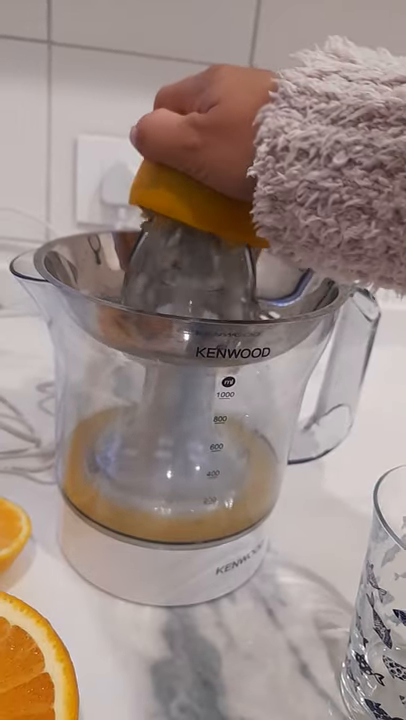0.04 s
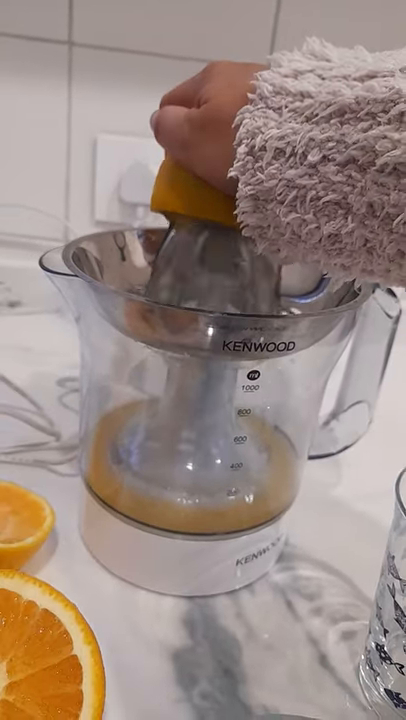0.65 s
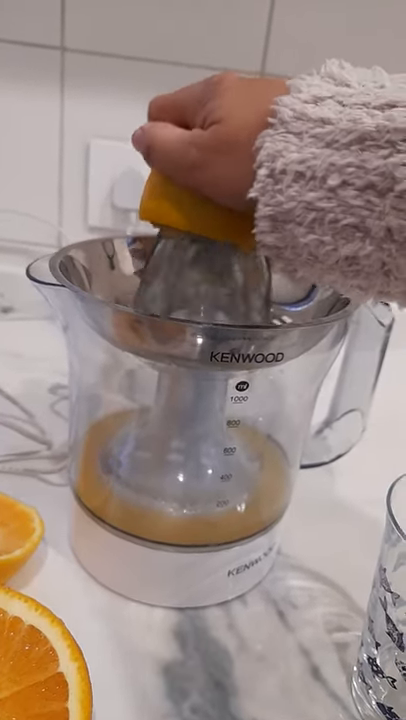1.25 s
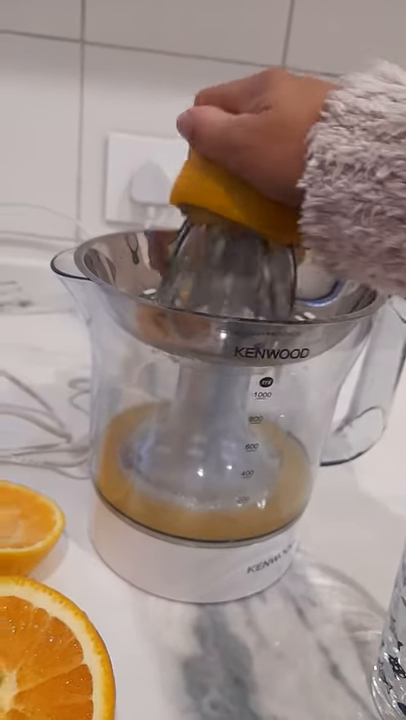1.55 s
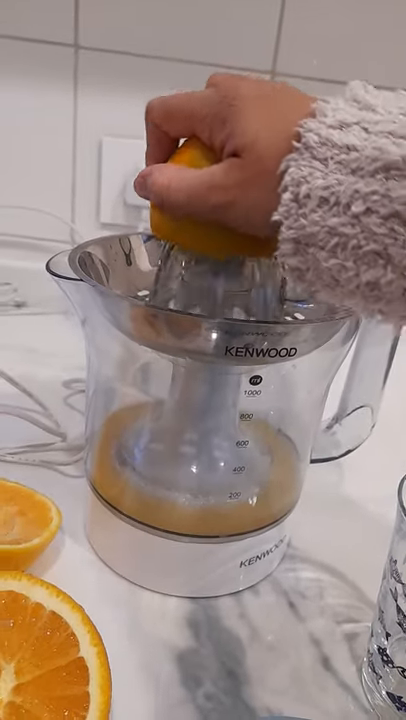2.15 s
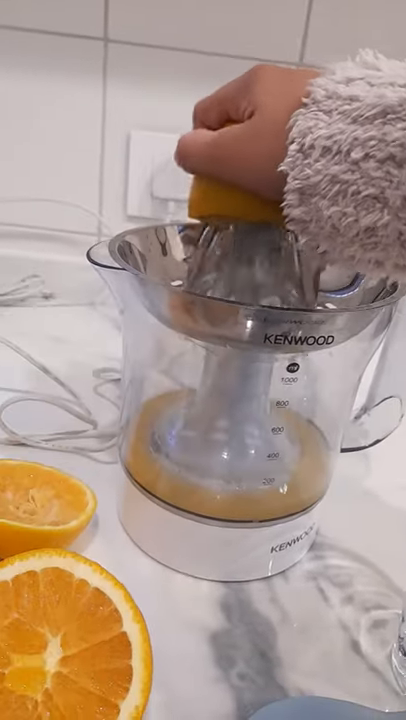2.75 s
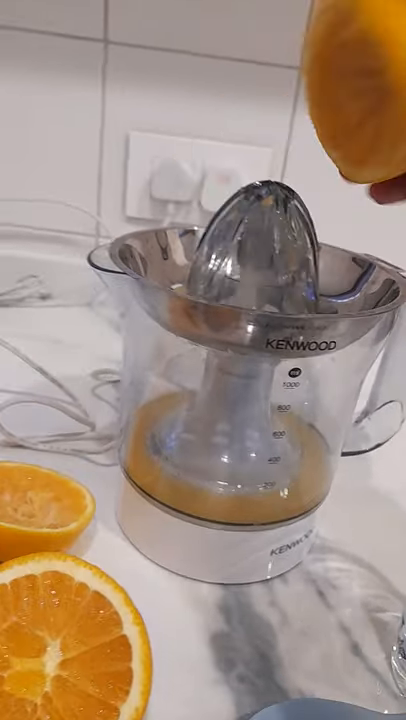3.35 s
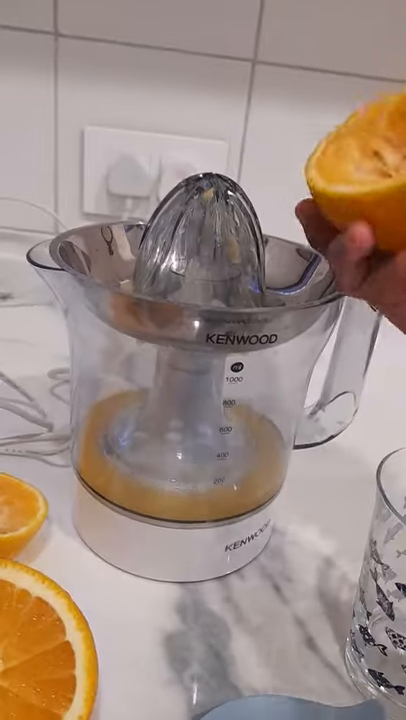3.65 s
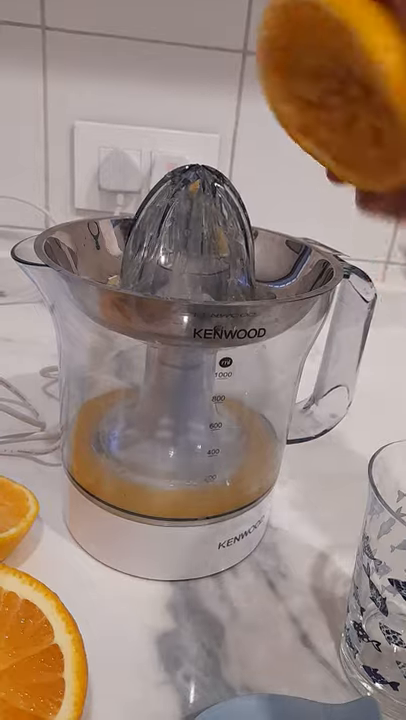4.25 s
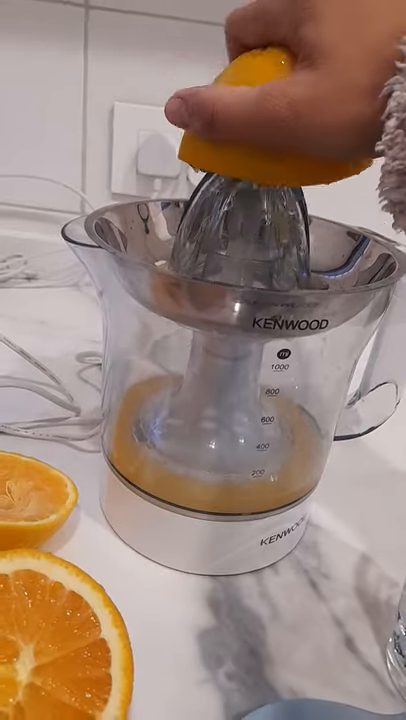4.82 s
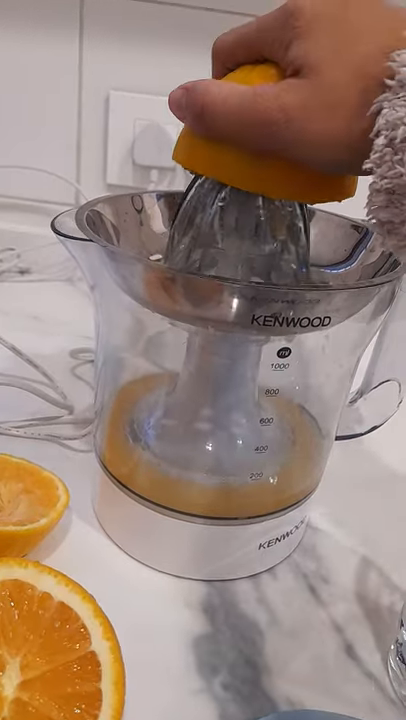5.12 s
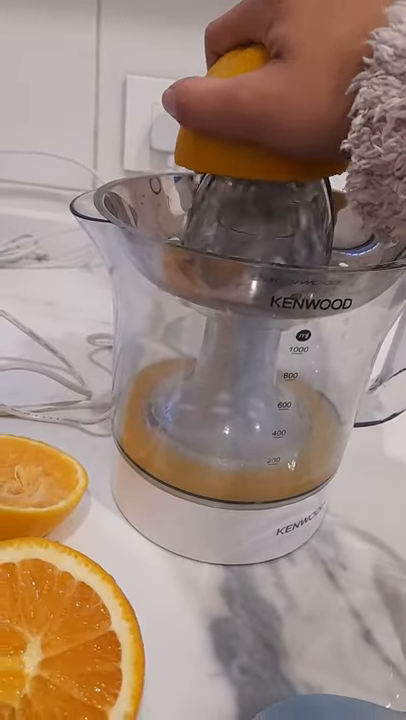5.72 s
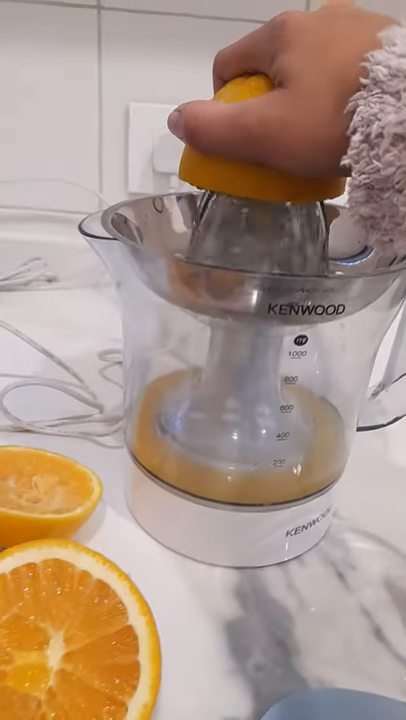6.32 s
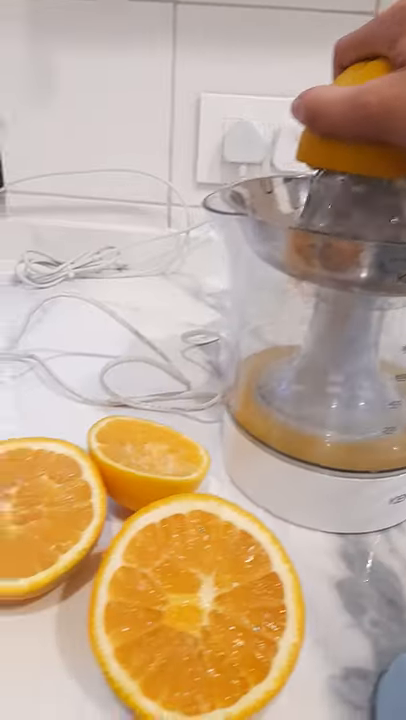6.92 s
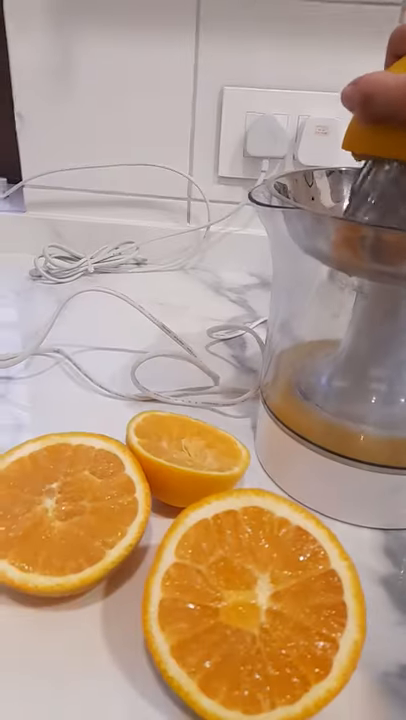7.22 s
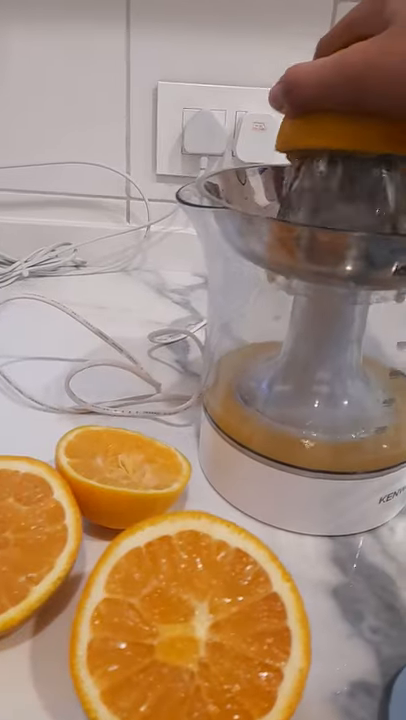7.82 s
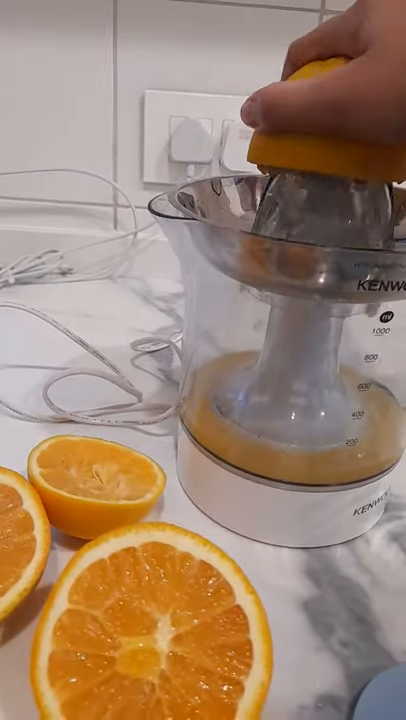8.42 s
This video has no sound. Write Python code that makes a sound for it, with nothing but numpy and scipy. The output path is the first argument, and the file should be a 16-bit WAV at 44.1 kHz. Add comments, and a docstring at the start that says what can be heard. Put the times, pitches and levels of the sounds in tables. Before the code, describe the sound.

The loud, rattling hum of an electric juicer squeezing oranges, broken by a short pause with faint wet squelches before it restarts.

```python
"""Electric citrus juicer

A juicer squeezes two orange halves on a kitchen worktop, stopping for two seconds in between.
Its synchronous motor hums at harmonics of the mains, its plastic gears whine and chatter under the
pulsating torque, and the reamer grinds by friction, louder as the hand bears down.
The pulp squelches faintly in the pause, and the motor restarts with a few clacks."""
import sys
import numpy as np
from scipy import signal
from scipy.fft import rfft, irfft
from scipy.io import wavfile

SR = 44100
rng = np.random.default_rng(int(sys.argv[2]) if len(sys.argv) > 2 else 0)


def log_audio(samples):
    """Write samples as a 16-bit WAV file to the path given in sys.argv[1]."""
    # one column per channel
    frames = np.atleast_2d(samples).T
    # limit to full scale, then quantise
    limited = np.clip(frames, -1, 1)
    pcm = np.round(limited * 32767).astype(np.int16)
    wavfile.write(sys.argv[1], SR, pcm)


N = 377937
T = np.arange(N) / SR
SLOW_T = T[::128]  # coarse time axis for envelopes
HZ = np.fft.rfftfreq(8192, 1 / SR)

MAINS_HZ = 50.06
GEAR_HZ = MAINS_HZ * 2 / 9  # turns of the gear per second
RUN_UP_S = 0.16  # from switching on until the rotor locks to the mains
DRONE_HARMONICS = (2, 6, 10)

# Levels in the tables are relative; pan_db is left minus right.
# Motor runs, one per orange half: on_s, off_s, chatter_db, scrape_db
PRESSES = [(-.4, 2.956, -29.5, -42.5), (5.138, 8.8, -29.5, -40.5)]
SECOND_HALF_S = PRESSES[0][1] + 1  # in the pause; the second-press columns apply from here
# Hum partials on the mains frequency: harmonic, first_press_db, second_press_db, pan_db
HUM_PARTIALS = [(4, -43, -40, 0), (5, -61, -46, -2), (8, -46, -42, -2), (9, -57, -46, 0),
                (12, -36, -41, -1), (13, -50, -49, -3), (14, -47, -34, -7), (16, -47, -50, 9),
                (17, -48, -46, 4), (19, -53, -44, 5), (20, -49, -45, 3), (22, -42, -47, 6),
                (23, -48, -47, 5), (24, -30, -36, 1), (25, -51, -48, -2), (26, -40, -45, -9),
                (28, -45, -38, -3), (29, -48, -44, -3), (30, -46, -45, -3), (36, -49, -52, -5),
                (40, -48, -52, -6)]
# Drifting low hum partials, one list per press: time_s, harmonic_2_db, harmonic_6_db, harmonic_10_db
DRONE_LEVELS = [
    [(0, -37, -31.5, -26), (.6, -39, -33, -29.5), (1.2, -34.5, -32.5, -31), (1.7, -40.5, -35.5, -30),
     (2.2, -46, -32.5, -28.5), (2.95, -36.5, -33, -29.5)],
    [(5.33, -38, -23.5, -37), (5.5, -31, -22.5, -33.5), (6.0, -28.5, -23.5, -41.5),
     (6.6, -31, -25.5, -35.5), (7.2, -29, -25, -50), (7.7, -32.5, -26.5, -31), (8.2, -27.5, -25.5, -49),
     (8.57, -26, -25.5, -30)],
]
# Whine partials on the gear's turning rate: harmonic, first_press_db, second_press_db, pan_db
WHINE_PARTIALS = [(13, -45, -49, 0), (23, -46, -47, -2), (25, -44, -52, -7), (58, -43, -48, -3),
                  (59, -40, -49, -6), (67, -46, -52, 0), (72, -47, -54, 4), (76, -40, -36, 5),
                  (77, -45, -39, 3), (85, -48, -43, 3), (86, -48, -42, 5), (94, -41, -55, -2),
                  (95, -41, -50, -2), (98, -46, -50, 8), (100, -45, -47, 1), (103, -40, -39, 6),
                  (104, -44, -41, 3), (107, -55, -41, -1), (109, -41, -38, 2), (112, -41, -42, -1),
                  (113, -44, -46, -2), (121, -48, -48, -3), (127, -51, -46, -4), (130, -39, -39, 4),
                  (131, -42, -43, -3), (139, -45, -52, -2), (140, -46, -48, -2)]
# Broad response of the housing: frequency_hz, gain_db
HOUSING_RESPONSE = [(25, -24.5), (55, -14.5), (80, -9), (200, -8), (400, -5), (800, -1.5), (1300, -1),
                    (1900, -2), (2500, -14), (4000, -17.5), (8000, -28.5), (16000, -49)]
# Resonances of the housing: frequency_hz, width_hz, lift_db
HOUSING_MODES = [(88.2, 24, 16.2), (143, 20, 3.9), (304.2, 52, 15.5), (484.8, 66.4, 14.6),
                 (699.5, 110, 4.8), (1162, 150, 9.8), (1432, 143, 10.7)]
# Response of the reamer and jug: frequency_hz, first_press_db, second_press_db
REAMER_RESPONSE = [(60, -22, -17), (302.5, -1.5, -6.5), (480, 7.5, 6.5), (793, -9, -10), (1490, -9, 0.5),
                   (2180, 3, -0.5), (3130, 3.5, 0.5), (3390, -6, -3), (4120, 2, 0), (5170, -7, -6.5),
                   (7070, -9.5, -11), (7980, -18, -20), (12300, -16, -16), (16000, -27, -29)]
# Ribs biting into the fruit as the hand bears down: start_s, rise_s, hold_s, level_db
BITES = [(0.128, 0.039, 0.022, -31.5), (0.292, .03, .02, -35), (0.48, .055, 0.056, -27.5),
         (0.643, .02, 0.044, -35), (0.81, 0.017, 0.048, -38), (0.947, 0.01, 0.019, -35.5),
         (1.05, .012, 0.13, -32), (1.153, 0.024, 0.12, -31), (1.437, 0.0087, 0.024, -32),
         (1.567, 0.024, .01, -39), (1.682, 0.02, 0.031, -31), (1.896, .012, 0.02, -30),
         (2.047, 0.024, .015, -31.5), (2.122, 0.022, 0.027, -33), (2.255, .012, 0.15, -37.5),
         (2.405, 0.039, 0.075, -33), (2.689, .018, 0.0072, -29.5), (2.745, 0.074, .04, -34),
         (2.855, 0.055, 0.11, -28), (5.168, 0.012, .04, -39), (5.214, .01, 0.1, -31.5),
         (5.38, 0.072, 0.26, -33.5), (6.117, 0.056, 0.33, -32), (6.506, 0.026, 0.13, -35.5),
         (6.75, 0.036, 0.034, -35), (6.895, 0.024, 0.03, -37), (7.326, 0.083, .13, -37),
         (7.512, 0.034, 0.14, -33), (7.72, .03, .25, -37)]
# Spectrum of a bearing tap: frequency_hz, level_db
BEARING_SPECTRUM = [(300, -14), (3000, 0), (8000, -6.5), (11000, -8), (14000, -6), (16000, -12)]
# Plastic impacts as the reamer catches, lifts and engages: start_s, crack_db, thump_db
CLACKS = [(.298, -31, -34), (.551, -35, -31), (.689, -27, -30), (.957, -32, -29), (1.049, -27, -23.5),
          (1.218, -40, -38), (1.447, -43, -46), (1.489, -27, -22), (1.908, -46, -24), (2.07, -27.5, -23),
          (2.256, -29, -41), (2.696, -33.5, -36), (2.927, -42, -41), (2.976, -38, -23), (3.177, -54, -32.5),
          (3.21, -49, -37.5), (5.142, -39.5, -35), (5.166, -31.5, -21), (5.2, -35, -16),
          (5.222, -23.5, -23), (5.268, -39, -22)]
# Response of the base to a clack: frequency_hz, gain_db
THUMP_RESPONSE = [(40, -29.5), (90, 3.5), (180, -14), (290, 2), (380, -11.5), (480, 6.5), (650, -14),
                  (1400, -13.5), (3000, -22.5), (12000, -52)]
# Base rocking as the rotor coasts down or runs up: peak_s, level_db, rise_db_per_s, fall_db_per_s
ROCKS = [(3.0, -31.5, 452, 68), (5.25, -29.5, 139, 220)]
# Response of the base on its feet: frequency_hz, gain_db
ROCKING_RESPONSE = [(30, -44.5), (62, -25), (86, 4.5), (115, -21), (143, -7), (190, -22), (290, -6.5),
                    (400, -26.5), (1500, -50)]
# Wet ticks of the pulp: start_s, level_db
SQUELCHES = [(3.778, -75.5), (3.996, -61.5), (4.052, -69), (4.08, -66), (4.111, -71), (4.482, -71),
             (4.53, -72), (4.629, -60), (4.772, -66), (4.955, -62), (4.971, -65), (5.016, -58), (5.06, -54),
             (5.117, -59)]
# Spectrum of a wet tick: frequency_hz, level_db
PULP_SPECTRUM = [(200, -26), (1500, -14.5), (3000, -13), (6000, -1.5), (7500, 3), (12000, -3),
                 (16000, -10.5)]
# The next half is turned in the hand and set on the reamer: start_s, rise_s, hold_s, rustle_db, rub_db
HANDLING = [(4.33, 0.084, 0.25, -76.5, -62.5), (4.76, .07, 0.14, -79, -60.5), (4.94, 0.069, 0.18, -67, -60)]
# Spectrum of the handled fruit's rustle: frequency_hz, level_db
RUSTLE_SPECTRUM = [(300, -14), (2500, 2), (6000, 8.5), (9000, -8.5), (16000, -9.5)]
# Ambient noise of the kitchen: frequency_hz, level_db
KITCHEN_SPECTRUM = [(15, -70.5), (25, -34), (44, -12.5), (101, -6), (122, -22.5), (193, -4), (260, -14),
                    (297, -0.5), (322, -8.5), (410, -10.5), (919, -25.5), (3440, -43.5), (12200, -37),
                    (15500, -45.5)]
# Reverberation time of the kitchen: frequency_hz, t60_s
REVERB_TIMES = [(100, 1), (260, 0.59), (700, 0.68), (1840, 0.66), (4850, 0.48), (14000, 0.3)]
# Paths to the two microphones: frequency_hz, pan_db, left_lead_rad, scattered_to_direct_ratio
STEREO_PATHS = [(98.7, 1, 0.25, .03), (292, -4.5, 0.4, .1), (496, -3, 0.63, 0.3), (750, 3.5, 0.96, 0.87),
                (1196, -2, -1.14, 1), (3080, 0, -2, 1.6), (5550, -1.5, -2, 2.7), (7960, 0, -6, 0.95),
                (12060, 4, -4.5, 1.3)]


def motor_hum(gain_db):
    """Synchronous rotation: a rotor locked to the mains vibrates at harmonics of the mains frequency."""
    return sum(partial(harmonic * MAINS_HZ, gain_db + per_press(levels_db), pan_db)
               for harmonic, *levels_db, pan_db in HUM_PARTIALS)


def motor_drone():
    """Amplitude modulation: three strong low harmonics of the motor slowly swell and fade."""
    times, *curves_db = np.vstack(DRONE_LEVELS).T
    pitches_hz = MAINS_HZ * np.array(DRONE_HARMONICS)
    return sum(partial(hz, np.interp(SLOW_T, times, curve_db), curve(STEREO_PATHS, hz))
               for hz, curve_db in zip(pitches_hz, curves_db))


def gear_whine(gain_db):
    """Periodic excitation: meshing repeats each turn, giving harmonics of the gear's turning rate."""
    return sum(partial(harmonic * GEAR_HZ, gain_db + per_press(levels_db), pan_db)
               for harmonic, *levels_db, pan_db in WHINE_PARTIALS)


def partial(hz, level_db, pan_db):
    """Narrow-band modulation: one stereo tone of the drive sways in level and flutters in phase."""
    sway_db = 1.13 * min(hz / 800, 1)
    flutter = 1 + per_press((0.15, 0.05)) * (wander(SLOW_T, 22) + 1j * wander(SLOW_T, 22))
    envelope = rotor_lock() * gain_of(level_db + sway_db * wander(SLOW_T, 4)) * flutter
    tone = np.interp(T, SLOW_T, envelope) * np.exp(2j * np.pi * (hz * T + rng.random()))
    path = gain_of(pan_db / 2) * np.exp(0.5j * curve(STEREO_PATHS, hz, column=2))
    constant_power = np.sqrt(2 / np.cosh(2 * np.log(abs(path))))
    return constant_power * np.array([(tone * path).real, (tone / path).real])


def rotor_lock(lock_s=0.062, drop_s=0.031, linger_s=0.1):
    """Two-stage decay: the tones enter as the rotor locks, drop at switch-off, then linger in the room."""
    envelope = np.zeros(len(SLOW_T))
    for on, off, *_ in PRESSES:
        onset = np.clip((SLOW_T - on - RUN_UP_S) / lock_s + 0.5, 0, 1)
        since_off = np.maximum(SLOW_T - off, 0)
        envelope += onset * np.maximum(np.exp(-since_off / drop_s), 0.22 * np.exp(-since_off / linger_s))
    return envelope


def running(on, off, spin_up_s=0.021, cut_s=0.045):
    """Inertia: the drive ramps briefly up to 1 at switch-on and down to 0 at switch-off."""
    return np.clip((T - on) / spin_up_s, 0, 1) * np.clip(1 - (T - off) / cut_s, 0, 1)


def torque_ripple(depth_db, snap):
    """Torque ripple: the motor pulls twice per mains cycle, and snapping gear play adds overtones."""
    angle = 4 * np.pi * MAINS_HZ * T
    return gain_of(depth_db * (np.cos(angle) + snap * (np.cos(2 * angle) + np.cos(3 * angle))))


def gear_chatter(backlash_s, uneven_db, loose_ratio, carry, per_turn):
    """Impact excitation: tooth strikes, jittered by backlash, and loose extra strikes ring the housing."""
    places = (np.arange(per_turn) + rng.random(per_turn)) / per_turn
    signs = rng.choice([-1, 1], per_turn)
    turns = np.arange(int(N / SR * GEAR_HZ) + 1)[:, None]
    times = (turns + places) / GEAR_HZ + backlash_s * rng.standard_normal((len(turns), per_turn))
    sizes = signs * gain_of(uneven_db * rng.standard_normal(times.shape))
    teeth = unit_rms(impulses(times.ravel(), sizes.ravel()))
    # tooth strikes are kept above 650 Hz, leaving the low hum clear
    teeth = signal.sosfilt(signal.butter(4, 650, "high", fs=SR, output="sos"), teeth)
    loose = rng.choice([-1, 1], N) * rng.uniform(0.44, 1, N) * (rng.random(N) < 1600 / SR)
    # a loose strike comes back, weaker, on the next turns of the rotor
    loose = sum(carry ** turn * np.roll(loose, round(turn * SR / MAINS_HZ)) for turn in range(4))
    strikes = (teeth + loose_ratio * unit_rms(loose)) * torque_ripple(depth_db=3.5, snap=0.25)
    modes_db = sum(db / (1 + (2 * (HZ - hz) / width) ** 4) for hz, width, db in HOUSING_MODES)
    sound = radiate(strikes, curve(HOUSING_RESPONSE, HZ) + modes_db, scatter_s=0.0044)
    return sound / band_rms(sound, 1000, 1600)


def chatter_strength(load, surge_db=9, surge_at_s=0.161, surge_width_s=0.018, taut_db=-1.5):
    """Backlash: chatter surges as the rotor pulls into lock and eases when load takes up the play."""
    drive = np.zeros(N)
    for on, off, chatter_db, _ in PRESSES:
        surge = np.exp(-((T - on - surge_at_s) / surge_width_s) ** 2)
        drive += running(on, off) * gain_of(chatter_db + surge_db * surge)
    tautness = np.minimum(load / gain_of(-26.5), 1)
    return drive * gain_of(taut_db * tautness)


def reamer_grinding(slips_per_s, spread_db, clump_db, ribs):
    """Stick-slip friction: each rib scrapes in clumps of tiny impacts, ringing the jug by its own path."""
    grip = torque_ripple(depth_db=2.0, snap=0.86) * gain_of(clump_db * wander(T, 60))
    in_second = T > SECOND_HALF_S
    out = np.zeros((2, N))
    for column, active in enumerate([~in_second, in_second], 1):
        sound = np.zeros((2, N))
        for _ in range(ribs):
            sizes = gain_of(spread_db * np.minimum(rng.exponential(1, N), 3)) * rng.choice([-1, 1], N)
            slips = (rng.random(N) < slips_per_s / ribs / SR) * sizes * grip
            sound += radiate(slips, curve(REAMER_RESPONSE, HZ, column), scatter_s=0.0044)
        out += active * sound / band_rms(sound, 2720, 12000)
    return out


def reamer_load():
    """Power addition: a steady scrape and the strongest bite combine while the motor runs."""
    bite = np.max([gain_of(db) * swell(*timing) for *timing, db in BITES], axis=0)
    return sum(running(on, off) * np.hypot(gain_of(scrape_db), bite) for on, off, _, scrape_db in PRESSES)


def bearing_buzz(level_db, uneven_db):
    """Periodic impacts: in the second press the rotor taps its bearing at each torque pulse."""
    times = np.arange(int(N / SR * 2 * MAINS_HZ)) / (2 * MAINS_HZ)
    sizes = gain_of(uneven_db * rng.standard_normal(len(times)))
    taps = impulses(times, sizes * (times > PRESSES[1][0] + RUN_UP_S))
    return gain_of(level_db) * unit_rms(radiate(taps, curve(BEARING_SPECTRUM, HZ), scatter_s=0.00079))


def reamer_clacks():
    """Transient response: each clack excites a bright crack in the jug and a low thump in the base."""
    crack = bursts(CLACKS, REAMER_RESPONSE, decay_s=0.0064, scatter_s=0.003)
    thump = bursts(CLACKS, THUMP_RESPONSE, decay_s=0.012, scatter_s=0.0093, column=2)
    return gain_of(10) * crack + gain_of(3) * thump


def base_rocking():
    """Forced vibration: the base shudders at its low resonances as the rotor stops and restarts."""
    envelope = sum(gain_of(db - np.maximum(rise * (peak - T), fall * (T - peak)))
                   for peak, db, rise, fall in ROCKS)
    shudder = radiate(rng.standard_normal(N), curve(ROCKING_RESPONSE, HZ), scatter_s=0.004)
    return envelope * unit_rms(shudder)


def pulp_squelches():
    """Broadband transients: the wet pulp ticks in very short, bright bursts."""
    return gain_of(4.5) * bursts(SQUELCHES, PULP_SPECTRUM, decay_s=0.0031, scatter_s=0.0017)


def handling_and_ambience(ambient_db):
    """Friction noise: fruit turned in the hand rubs and rustles over the kitchen's steady low noise."""
    murmur = radiate(rng.standard_normal(N), curve(KITCHEN_SPECTRUM, HZ), scatter_s=0.0093)
    grains = rng.standard_normal(N) * (rng.random(N) < 1500 / SR) * gain_of(2.4 * wander(T, 27))
    rustle = radiate(grains, curve(RUSTLE_SPECTRUM, HZ), scatter_s=0.0023)
    touches = [gain_of([[rustle_db], [rub_db]]) * swell(*timing) for *timing, rustle_db, rub_db in HANDLING]
    rustle_gain, rub_gain = np.max(touches, axis=0)
    return np.hypot(gain_of(ambient_db), rub_gain) * unit_rms(murmur) + rustle_gain * unit_rms(rustle)


def reverberation(x):
    """Diffuse field: tiled walls return a dense tail in which each band decays at its own rate."""
    reflections = rng.standard_normal((2, SR)) * (np.arange(SR) > 0.005 * SR)
    hz, t, bands = signal.stft(reflections, SR, nperseg=512)
    coherence = 1 / (1 + (hz[:, None] / 700) ** 2)  # long waves reach both microphones alike
    bands[1] = coherence * bands[0] + np.sqrt(1 - coherence ** 2) * bands[1]
    decay = gain_of(-60 * t / curve(REVERB_TIMES, hz)[:, None])
    tail = signal.istft(bands * decay, SR, nperseg=512)[1]
    return signal.fftconvolve(x, tail / np.linalg.norm(tail[0]), axes=1)[:, :N]


def radiate(x, response_db, scatter_s):
    """Source-filter principle: x rings a minimum-phase body, then travels to both microphones."""
    log_gain = np.log(gain_of(np.r_[response_db, response_db[-2:0:-1]]))
    body = np.exp(np.conj(signal.hilbert(log_gain)))[:len(HZ)]
    channels = []
    for side in (1, -1):
        direct = np.exp(0.5j * side * curve(STEREO_PATHS, HZ, column=2))
        path = direct + curve(STEREO_PATHS, HZ, column=3) * scattering(scatter_s)
        # pan, and flatten the interference ripple
        path *= gain_of(side * curve(STEREO_PATHS, HZ) / 2) / abs(path) ** 1.12
        impulse_response = np.roll(irfft(body * path), 64)[:4096]
        channels.append(signal.oaconvolve(x, impulse_response)[64:N + 64])
    return np.array(channels)


def scattering(decay_s):
    """Multiple reflection: the spectrum of a short, dying cloud of echoes of unit energy."""
    t = np.arange(2 * len(HZ) - 2) / SR
    cloud = rng.standard_normal(len(t)) * np.exp(-t / decay_s)
    return rfft(cloud / np.linalg.norm(cloud))


def bursts(events, response, decay_s, scatter_s, column=1):
    """Exponential decay: each event is a dying cluster of micro-impacts, filtered at unit power gain."""
    envelope = sum(gain_of(event[column]) * (T >= event[0]) * np.exp(-abs(T - event[0]) / decay_s)
                   for event in events)
    impacts = unit_rms(rng.standard_normal(N) * (rng.random(N) < 0.25))
    response_db = curve(response, HZ)
    power_db = 10 * np.log10(np.mean(gain_of(response_db) ** 2))
    return radiate(envelope * impacts, response_db - power_db, scatter_s)


def swell(start, rise_s, hold_s, release_s=0.045):
    """Envelope of one push of the hand: linear rise, hold, exponential release."""
    since_release = np.maximum(T - start - rise_s - hold_s, 0)
    return np.clip((T - start) / rise_s, 0, 1) * np.exp(-since_release / release_s)


def impulses(times, sizes):
    """Impulse train with the given times and amplitudes."""
    inside = (times >= 0) & (times < (N - 1) / SR)
    return np.bincount(np.round(times[inside] * SR).astype(int), sizes[inside], N)


def wander(times, rate_hz):
    """Band-limited noise of rms near 1 that changes about rate_hz times a second."""
    points = signal.resample_poly(rng.standard_normal(1024), 8, 1)
    return np.interp(times * rate_hz * 8, np.arange(len(points)), points)


def per_press(pair):
    """Step function on the coarse time axis, from the first press's value to the second's."""
    return np.where(SLOW_T > SECOND_HALF_S, pair[1], pair[0])


def curve(table, hz, column=1):
    """One column of a table, interpolated on a log-frequency axis."""
    columns = np.transpose(table)
    return np.interp(np.log(hz + 1), np.log(columns[0] + 1), columns[column])


def band_rms(x, low_hz, high_hz):
    """Rms of the channel mean within a band, from its spectral energy."""
    hz = np.fft.rfftfreq(N, 1 / SR)
    band = rfft(x.mean(0))[(hz > low_hz) & (hz < high_hz)]
    return np.sqrt(2 * np.sum(abs(band) ** 2)) / N


def unit_rms(x):
    """Normalisation to rms 1."""
    return x / np.sqrt(np.mean(x ** 2) + 1e-20)


def gain_of(db):
    """Decibels to amplitude ratio."""
    return 10 ** (np.asarray(db) / 20)


def scene():
    """Superposition: the juicer's tones and rattle, the rattle's reverberation and the quiet kitchen."""
    load = reamer_load()
    tones = motor_hum(gain_db=-0.5) + gear_whine(gain_db=-1.0) + motor_drone()
    chatter = gear_chatter(backlash_s=0.00015, uneven_db=2.0, loose_ratio=1.1, carry=0.36, per_turn=126)
    rattle = chatter_strength(load) * chatter
    rattle += load * reamer_grinding(slips_per_s=2600, spread_db=4.0, clump_db=0.5, ribs=3)
    rattle += bearing_buzz(level_db=-49.5, uneven_db=0.5) + reamer_clacks() + pulp_squelches()
    reflected = gain_of(-8.5) * reverberation(rattle)
    return tones + rattle + reflected + base_rocking() + handling_and_ambience(ambient_db=-63)


def record(dry, low_hz=38, high_hz=15900):
    """Band limiting: small microphones lose the deepest bass, and a steep low-pass cuts the top treble."""
    thinned = signal.sosfilt(signal.butter(2, low_hz, "high", fs=SR, output="sos"), dry)
    low_pass = signal.firwin(1023, high_hz, window=("kaiser", 9), fs=SR)
    return signal.oaconvolve(thinned, low_pass[None], "same")


dry = scene()
out = record(dry)
log_audio(out)
```